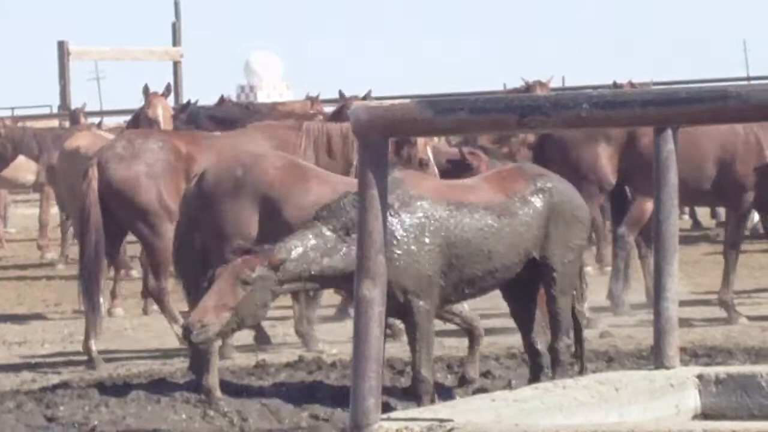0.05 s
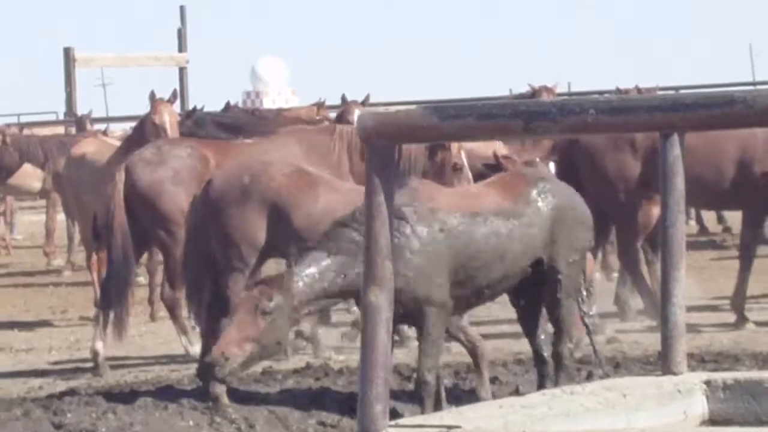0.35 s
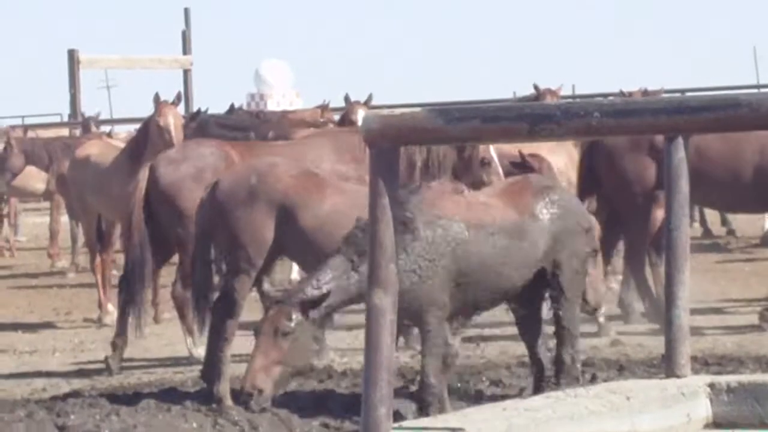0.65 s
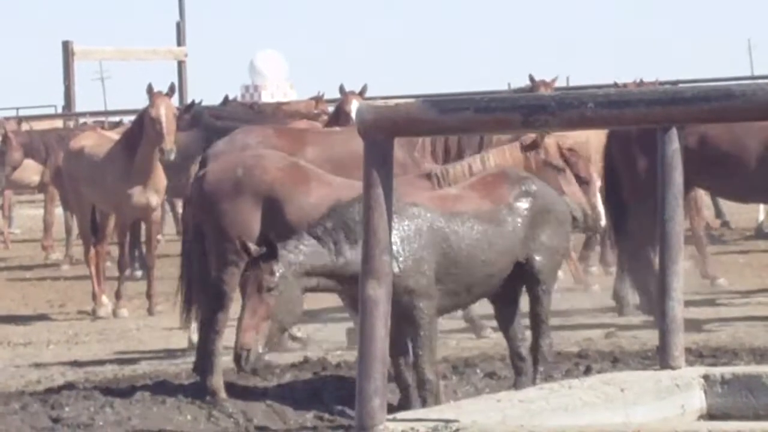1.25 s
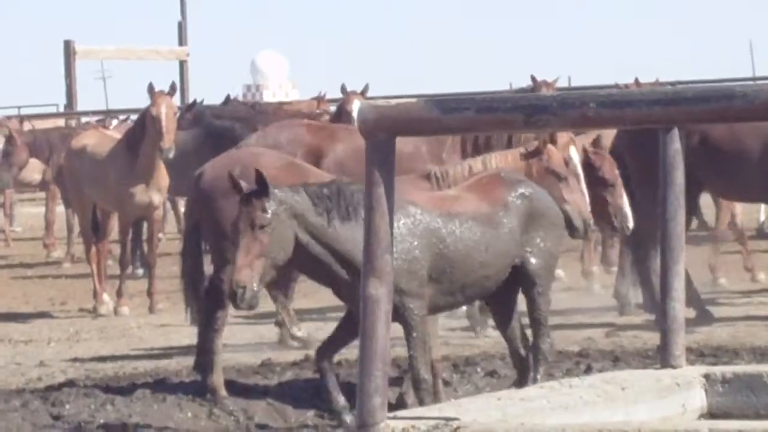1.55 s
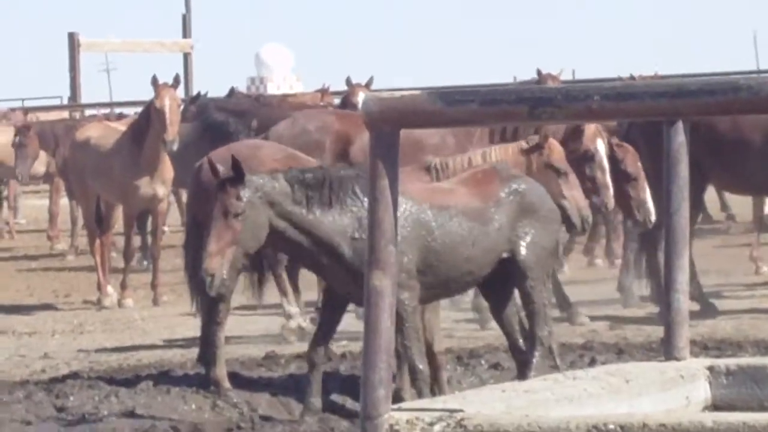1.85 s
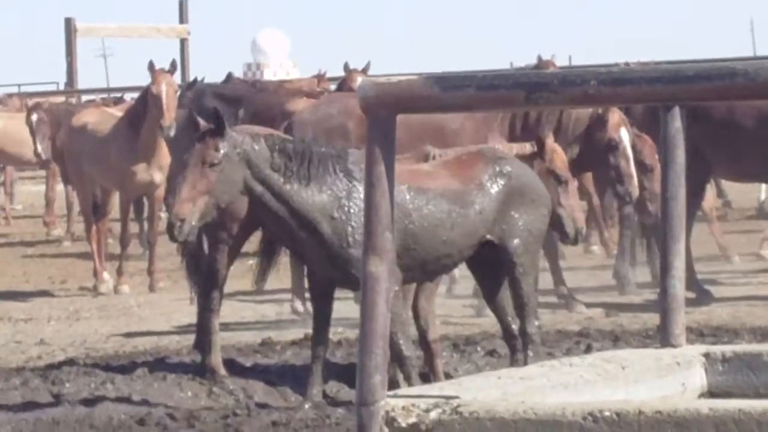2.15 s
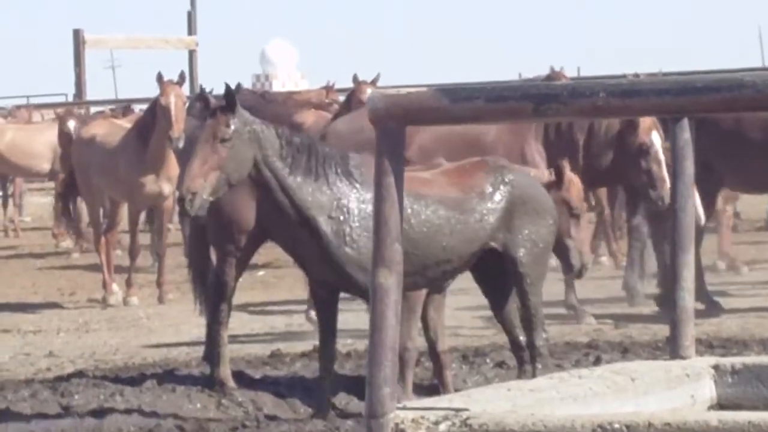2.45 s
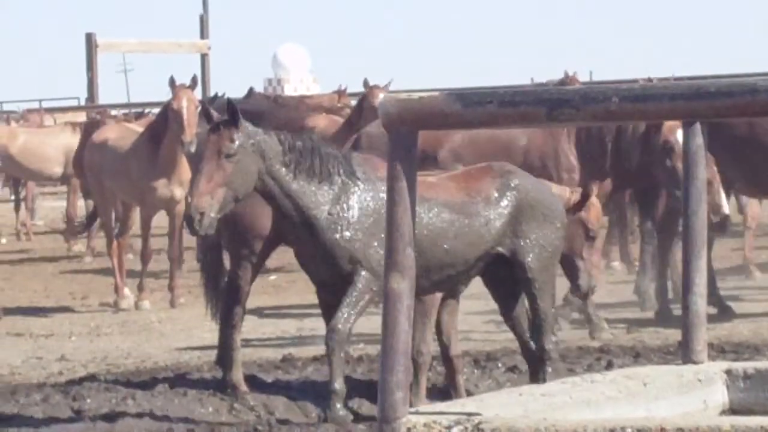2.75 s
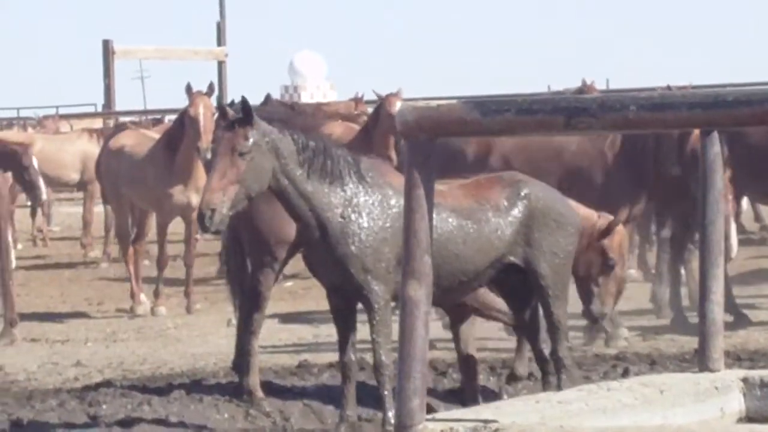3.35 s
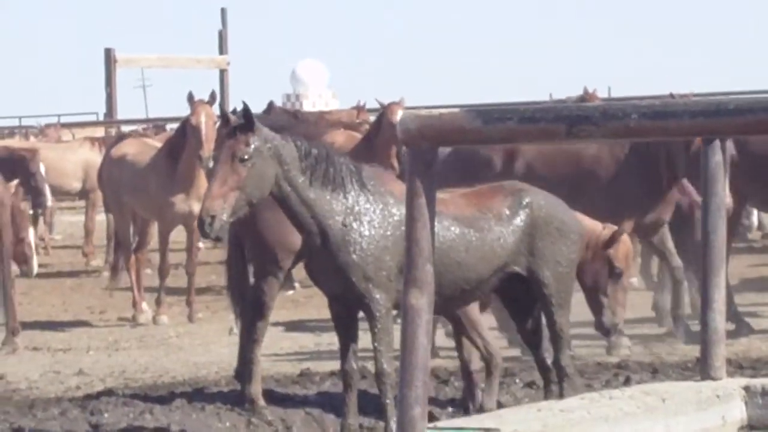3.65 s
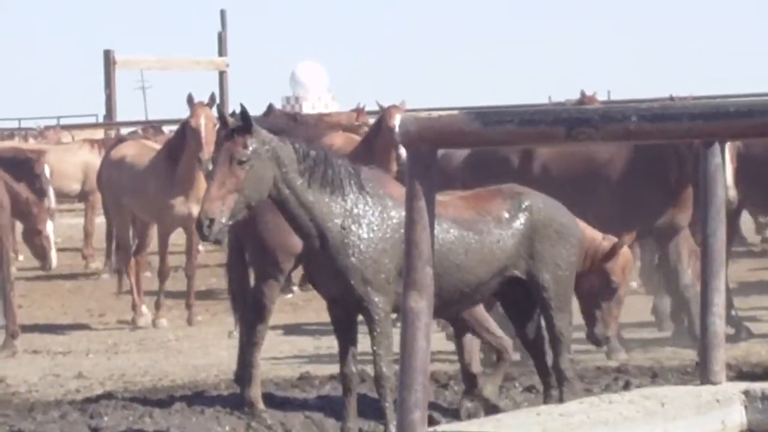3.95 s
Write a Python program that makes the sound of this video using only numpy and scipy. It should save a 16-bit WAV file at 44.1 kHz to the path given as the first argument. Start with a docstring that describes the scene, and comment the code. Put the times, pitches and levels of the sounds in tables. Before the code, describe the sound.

Wet mud squelches under a horse's hooves from about 0.3 to 1.3 seconds, with small bubble pops, low plops and a hollow knock near 1 second, echoing slightly. Sparser, softer thuds and scuffs follow, with brief squelches near 1.8 and 3 seconds, and another with light knocks around 3.6. Throughout, small birds chirp some way off over a faint outdoor hiss, and light wind rumbles on the microphone.

```python
"""A horse shifts about in a wet corral: mud squelches in bursts of tiny clicks that ring its air
pockets, and bubbles snap with a rising pitch. Hooves plop in, knock hollowly and scuff the soil.
Small birds chirp some way off over a faint outdoor hiss; light wind rumbles on the microphone.
Mud and far birds echo in the yard."""
import sys
import numpy as np
from scipy import signal
from scipy.fft import rfft, irfft, next_fast_len
from scipy.io import wavfile
from scipy.ndimage import map_coordinates

SR = 44100
rng = np.random.default_rng(int(sys.argv[2]) if len(sys.argv) > 2 else 0)


def dump(signal):
    """Clip the signal to [-1, 1] and save it as 16-bit WAV at the path in sys.argv[1]."""
    limited = np.clip(np.atleast_2d(signal).T, -1, 1)
    pcm = np.round(limited * 32767).astype(np.int16)
    wavfile.write(sys.argv[1], SR, pcm)


N = 176400


def amp(db):
    """dB to gain."""
    return 10 ** (np.asarray(db) / 20)


def unit(x):
    """Scale to rms 1."""
    return x / np.sqrt(np.mean(x ** 2) + 1e-20)


def along(points, hz):
    """Interpolate (Hz, value) points on a log frequency axis."""
    knots_hz, values = np.transpose(points)
    return np.interp(np.log(hz + 1), np.log(knots_hz + 1), values)


def clock():
    """Sample times in s."""
    return np.arange(N) / SR


def wobble(knots_per_s):
    """Smooth random curve."""
    knots = rng.standard_normal(int(N * knots_per_s / SR) + 4)
    return map_coordinates(knots, [clock() * knots_per_s])


def add(track, at_s, sound):
    """Mix a sound into a track."""
    i = max(round(at_s * SR), 0)
    track[i:i + len(sound)] += sound[:N - i]


def filtered(x, response):
    """Zero-phase filter with gain response(Hz)."""
    size = next_fast_len(N + SR // 2)
    return irfft(rfft(x, size) * response(np.fft.rfftfreq(size, 1 / SR)), size)[..., :N]


def coloured(x, points, size=2048):
    """Minimum-phase filter from (Hz, dB) points, unit energy gain."""
    cepstrum = irfft(np.log(amp(along(points, np.fft.rfftfreq(size, 1 / SR)))))
    cepstrum[1:size // 2] *= 2
    cepstrum[size // 2 + 1:] = 0
    impulse = irfft(np.exp(rfft(cepstrum)))
    return signal.fftconvolve(x, impulse / np.linalg.norm(impulse))[:N]


def rush(colour):
    """Coloured stereo noise of rms 1: bass nearly mono, treble wider."""
    # stereo width (frequency [Hz], side minus mid [dB])
    width = [(30, -55), (70, -57), (130, -56), (250, -35.5), (500, -20.5), (1000, -17.5), (2000, -14.5),
             (3000, -26), (5000, -9), (8000, -8), (13000, -6.5)]

    def response(hz):
        angle = np.arctan(amp(along(width, hz)))
        return amp(along(colour, hz)) * [np.cos(angle), np.sin(angle)]

    mid, side = filtered(rng.standard_normal((2, N)), response)
    return unit(np.array([mid + side, mid - side]))


def grains(length_s, clicks_per_s=1500, spread_db=5.5, attack_s=0.0015, release_s=0.0041):
    """Burst of tiny uneven clicks: attack, hold, release."""
    t = np.arange(SR // 5) / SR
    hit = rng.random(len(t)) < clicks_per_s / SR
    clicks = hit * np.sign(rng.standard_normal(len(t))) * amp(spread_db * rng.standard_normal(len(t)))
    burst = clicks * np.minimum(t / attack_s, 1) * np.exp(-np.maximum(t - length_s, 0) / release_s)
    return burst * np.sqrt(length_s * SR) / (np.linalg.norm(burst) + 1e-9)


def yard_echo(x, t60_s):
    """Diffuse echo off fences and animals, nearly mono."""
    t = np.arange(SR // 2) / SR
    mid, side = rng.standard_normal((2, len(t))) * amp(-60 * t / t60_s) * amp([[0], [-20]])
    tail = np.array([mid + side, mid - side]) / np.linalg.norm(mid)
    return signal.fftconvolve(x[None], tail, axes=1)[:, :N]


def air(hiss_db=-52, flock_db=-61):
    """Steady outdoor hiss and a blur of far birds."""
    # hiss and flock spectra (frequency [Hz], gain [dB])
    hiss_colour = [(180, -16), (300, 2.5), (337, -3), (543, -1.5), (718, -3.5), (876, -5.5), (1020, -6.5),
                   (1320, -8.5), (1840, -11.5), (2560, -10.5), (2770, -15), (3220, -20), (3670, -12),
                   (5110, -13.5), (6870, -15.5), (11300, -20.5), (12000, -22.5), (14700, -22), (15400, -22)]
    flock_colour = [(2000, -43), (2600, -7.5), (2950, -3.5), (3300, -5.5), (3900, -19), (6000, -40)]
    hiss = amp(hiss_db + 0.16 * wobble(5.4)) * rush(hiss_colour)
    flock = amp(flock_db + 1.55 * wobble(18)) * rush(flock_colour)
    return hiss + flock


def wind():
    """Gusts on the microphone; above them a lighter rumble of wind and trampling."""
    # gust and rumble envelopes (time [s], relative level [dB])
    gust_levels = [(0.0, -33), (0.29, -39.5), (0.3, -30), (0.88, -37.5), (0.96, -43), (1.0, -32),
                   (1.7, -49), (1.75, -42), (2.17, -51.5), (2.52, -50), (2.62, -34.5), (2.64, -44.5),
                   (2.83, -35), (2.86, -38.5), (3.01, -34), (3.12, -48), (3.94, -42.5), (4.0, -52)]
    rumble_levels = [(0.0, -39.5), (0.26, -40.5), (0.33, -35.5), (0.43, -40), (0.52, -37), (0.54, -39),
                     (0.59, -37.5), (1.73, -49.5), (2.97, -45.5), (3.01, -50), (3.05, -49.5), (4.0, -44.5)]
    # gust and rumble spectra (frequency [Hz], gain [dB])
    gust_colour = [(15, -12.5), (28, -1), (45, -2.5), (80, -4.5), (120, -12.5), (180, -23), (400, -68)]
    rumble_colour = [(50, -12), (100, 3.5), (140, 2.5), (240, -2), (330, -11), (600, -22.5), (1500, -43)]
    gust_db = np.interp(clock(), *np.transpose(gust_levels)) + 2 + 1.4 * wobble(18)
    gusts = amp(gust_db) * rush(gust_colour)
    rumble_db = np.interp(clock(), *np.transpose(rumble_levels)) - 1 + 2.1 * wobble(24.97)
    return gusts + amp(rumble_db) * rush(rumble_colour)


def birds(far_waver=0.036, far_flutter_db=3.5, echo_db=2):
    """Whistles arc through three pitches; near ones are clean, far ones waver and blur into echo."""
    # chirps (time [s], length [s], start [Hz], middle [Hz], end [Hz], level [dB], distance [0-1])
    chirps = [(0.219, 0.042, 3370, 3410, 3260, -50.5, 0.67), (0.253, 0.04, 3160, 2870, 3150, -43.5, 0.14),
              (0.633, 0.051, 3040, 2900, 3100, -44.5, 0.7), (0.684, 0.031, 4340, 4910, 5230, -49, .6),
              (0.302, 0.021, 3030, 2900, 2880, -46, 0.45), (0.75, 0.044, 3010, 2990, 2850, -45, .4),
              (0.917, 0.045, 3740, 4910, 3700, -46, 0.45), (0.986, 0.014, 2770, 2960, 3180, -39, .05),
              (1.105, 0.035, 2930, 3170, 3380, -40, 0.2), (1.144, 0.019, 3430, 2980, 3070, -40.5, .05),
              (1.293, 0.057, 3320, 3295, 3150, -51, 0.37), (1.474, 0.045, 3100, 3280, 3240, -54, .4),
              (1.649, 0.055, 3210, 3390, 3090, -48.5, 0.14), (1.812, .036, 5000, 4600, 4250, -57, .5),
              (1.877, .022, 4930, 4750, 4200, -55, .5), (1.96, 0.023, 2950, 3210, 3470, -52, 0.35),
              (1.994, 0.026, 3370, 3130, 2870, -48.5, .2), (2.206, 0.031, 2980, 2845, 2850, -45.5, .6),
              (2.226, .025, 6000, 6650, 6940, -57, 0.06), (2.248, .05, 2940, 3030, 3050, -56, 1),
              (2.255, .016, 4380, 4950, 5100, -43, 0.45), (2.267, .038, 5040, 4920, 4500, -39, 0.25),
              (2.348, 0.025, 3210, 3320, 3350, -48.5, .3), (2.369, .012, 4350, 4600, 4800, -52, .2),
              (2.376, 0.021, 3310, 3070, 2740, -47, 0.3), (2.423, 0.057, 3480, 3370, 3400, -51, 0.57),
              (2.476, 0.075, 2913, 2910, 2870, -49, 0.78), (2.836, .022, 6000, 6360, 6700, -56, .3),
              (2.871, 0.019, 4700, 5220, 5270, -44.5, .25), (2.881, 0.039, 5080, 4950, 4830, -46.5, .35),
              (2.968, .03, 4050, 4330, 4330, -57, .2), (3.037, 0.082, 2970, 2955, 3060, -52.5, 0.99),
              (3.1, 0.062, 3310, 3420, 3380, -59.5, 1), (3.146, 0.092, 2986, 2950, 2900, -45, 0.82),
              (3.281, .03, 2900, 2816, 2900, -54, .8), (3.321, 0.058, 3100, 3300, 3240, -44.5, 0.37),
              (3.375, 0.015, 3080, 2790, 2780, -46.5, 0.16), (3.553, 0.047, 3570, 3290, 3230, -55, .8),
              (3.583, 0.043, 3017, 2940, 3140, -43, 0.38), (3.644, 0.025, 3060, 2970, 2920, -53, 0.68),
              (3.849, 0.042, 3910, 3460, 3360, -55, 0.75), (3.877, 0.069, 3080, 3004, 2900, -52.5, 0.75)]
    direct, scattered = np.zeros((2, N))
    waver, flutter = unit(wobble(500) + wobble(130) / 2), wobble(220)
    for at_s, length_s, start_hz, middle_hz, end_hz, db, distance in chirps:
        progress = np.linspace(0, 1, int(length_s * SR))
        span = int(at_s * SR) + np.arange(len(progress))
        arc = np.polyfit([0, 0.5, 1], [start_hz, middle_hz, end_hz], 2)
        hz = np.polyval(arc, progress) * (1 + distance * far_waver * waver[span])
        gain = amp(db + distance * far_flutter_db * flutter[span])
        envelope = np.sqrt(np.abs(np.sin(np.pi * progress)))
        note = gain * envelope * np.sin(2 * np.pi * np.cumsum(hz) / SR)
        add(direct, at_s, (1 - distance / 2) * note)
        add(scattered, at_s, distance * note)
    return direct + amp(echo_db) * yard_echo(scattered, t60_s=0.25)


def hoof_scuffs():
    """Hooves scrape soil: dull, gritty bursts."""
    # scuffs (time [s], length [s], level [dB])
    scuffs = [(0.499, 0.054, -52.5), (1.76, 0.041, -50), (2.956, 0.049, -60), (3.621, 0.065, -48),
              (3.814, 0.0098, -49)]
    # soil spectrum (frequency [Hz], gain [dB])
    soil_colour = [(100, 2.5), (250, 5), (500, 8), (900, -4), (1500, -17), (3000, -5), (8000, -47)]
    grit = np.zeros(N)
    for at_s, length_s, db in scuffs:
        add(grit, at_s, amp(db) * grains(length_s))
    return coloured(grit, soil_colour)


def hoof_thuds(attack_s=0.0032, trim_db=-3):
    """Hooves sink into mud or land on soil: low damped sines."""
    # thuds (time [s], pitch [Hz], peak before trim [dB], t60 [s])
    thuds = [(0.3123, 80, -13, 0.031), (0.36, 90, -16, 0.032), (.393, 100, -20.5, .03),
             (0.542, 216, -14, 0.071), (0.678, 96, -20, 0.05), (.72, 279, -31, 0.1),
             (1.069, 123, -24.5, 0.081), (2.001, 65, -30, 0.099), (2.6, 74.6, -23, 0.079),
             (2.804, 46.7, -19.5, 0.24), (2.991, 52, -16.5, 0.094), (3.632, 107, -25, 0.047)]
    track = np.zeros(N)
    t = np.arange(SR // 4) / SR
    for at_s, hz, db, t60_s in thuds:
        swell = amp(-60 * t / t60_s) * (1 - np.exp(-(t / attack_s) ** 2))
        add(track, at_s, amp(db + trim_db) * swell / swell.max() * np.sin(2 * np.pi * hz * t))
    return track


def hoof_knocks(attack_s=0.0011, tail_db=-22.5, base_tail_t60_s=0.16):
    """Impacts ring the hoof's hollow modes, with a diffuse tail."""
    # knocks (time [s], peak [dB], pitch [ratio], ring length [ratio])
    knocks = [(1.0486, -19, 0.97, 0.96), (3.644, -31.5, 0.81, 0.64), (3.6651, -38, 0.92, 0.47),
              (3.8165, -42.5, 0.8, 0.41)]
    # hoof modes (base frequency [Hz], relative level [dB], base t60 [s])
    modes = [(608, -6.5, 0.05), (722, 3, 0.026), (960, 3.5, 0.023), (1055, 1, 0.037)]
    track = np.zeros(N)
    t = np.arange(SR // 4) / SR
    for at_s, db, pitch, sustain in knocks:
        ring = sum(amp(mode_db - 60 * t / (t60_s * sustain)) * np.sin(2 * np.pi * hz * pitch * t)
                   for hz, mode_db, t60_s in modes)
        ring *= 1 - np.exp(-(t / attack_s) ** 2)
        scatter = rng.standard_normal(len(t)) * amp(-60 * t / (base_tail_t60_s * sustain))
        tail = signal.fftconvolve(scatter, ring / np.linalg.norm(ring))[:len(t)]
        add(track, at_s, amp(db) * (amp(tail_db) * tail - ring / np.abs(ring).max()))
    return track


def mud_pockets(x, size=2048):
    """Air pockets in the mud resonate; unit energy gain."""
    # pocket modes (frequency [Hz], bandwidth [Hz], relative level [dB])
    modes = [(268, 23, 13), (560, 200, 7), (1220, 190, 7), (1730, 97, 6), (2180, 170, 3), (2900, 130, -30)]
    t = np.arange(size) / SR
    impulse = sum(amp(db) * width_hz * np.exp(-np.pi * width_hz * t) * np.cos(2 * np.pi * hz * t)
                  for hz, width_hz, db in modes)
    return signal.fftconvolve(x, impulse / np.linalg.norm(impulse))[:N]


def mud_squelches(body_db=-5):
    """Mud squeezes out in click bursts. Returns the drives for spray and wet body."""
    # squelches (time [s], length [s], level [dB], extra body [dB])
    squelches = [(0.304, 0.027, -54.5, 2), (.405, 0.047, -61.5, 7), (0.454, 0.031, -51, -12),
                 (0.514, 0.056, -61.5, 8), (0.58, 0.027, -51.5, -9), (0.614, 0.008, -44, -5),
                 (0.716, 0.032, -47, 6.5), (0.846, 0.021, -46, 7), (0.971, 0.023, -49, 10),
                 (1.005, 0.0096, -52, 4), (1.025, 0.011, -50.5, 0), (1.137, 0.021, -58.5, 13.5),
                 (1.217, 0.0091, -56, -8), (1.284, 0.029, -55, -6), (1.767, 0.036, -64.5, 16),
                 (2.971, 0.045, -58.5, 11), (3.61, 0.022, -53, -2)]
    spray, body = np.zeros((2, N))
    for at_s, length_s, db, extra_db in squelches:
        burst = amp(db) * grains(length_s)
        add(spray, at_s, burst)
        add(body, at_s, amp(body_db + extra_db) * burst)
    return spray, body


def bubble_snaps(attack_s=0.00047, crackle_t60_s=0.016, spread_db=5):
    """Each bubble bursts with a crackle and rings at a rising pitch. Returns crackles and tones."""
    # snaps (time [s], crackle level [dB], start pitch [Hz], tone level [dB])
    snaps = [(.3135, -44, 2100, -44), (0.3574, -42, 2900, -52), (.407, -52, 1720, -43),
             (.4665, -38.5, 2200, -50), (.6155, -34.5, 2490, -39), (0.621, -37, 4060, -40),
             (0.715, -28.5, 1148, -28), (.7175, -42, 2050, -28), (.724, -41, 1134, -36),
             (.731, -38, 1660, -42), (0.7417, -31, 2240, -33), (.7505, -34.5, 2220, -28),
             (.756, -36.5, 2880, -44), (0.76, -44, 4300, -48), (0.8368, -41, 2200, -48),
             (.8525, -42, 2020, -34), (.859, -47, 1840, -33), (.8625, -46, 2290, -39),
             (0.871, -36, 2400, -53), (0.9809, -41, 1250, -31.5), (.983, -42, 1760, -33),
             (.995, -52, 504, -36.5), (1.004, -38, 1700, -37), (1.0268, -36, 2180, -32),
             (1.049, -38.5, 2550, -38), (1.1318, -56, 990, -43), (1.147, -45, 2300, -50),
             (1.16, -48, 2000, -42), (1.187, -44, 2400, -48), (1.2895, -38.5, 2300, -55),
             (3.0075, -48, 2240, -40), (3.0115, -47, 2280, -46), (3.6255, -50, 2110, -48),
             (3.646, -48, 1500, -41), (3.6535, -54, 1420, -44)]
    ring_cycles, pitch_rise = 32.4, 0.085  # per 60 dB of decay
    crackles, tones = np.zeros((2, N))
    t = np.arange(SR // 16) / SR
    onset = 1 - np.exp(-t / attack_s)
    for at_s, crackle_db, hz, tone_db in snaps:
        fade = onset * amp(crackle_db - 60 * t / crackle_t60_s)
        crackle = fade * rng.standard_normal(len(t)) * amp(spread_db * rng.standard_normal(len(t)))
        add(crackles, at_s, crackle * np.linalg.norm(fade) / np.linalg.norm(crackle))
        age = t * hz / ring_cycles
        phase = 2 * np.pi * hz * t * (1 + pitch_rise * age / 2)
        add(tones, at_s, onset * amp(tone_db - 60 * age) * np.sin(phase))
    return crackles, tones


def mud(snap_body_db=-8):
    """Squelches and snaps give a bright spray and ring the air pockets; bubble tones on top."""
    # spray spectrum (frequency [Hz], gain [dB])
    spray_colour = [(200, -18), (1000, -8.5), (2000, 4), (3000, 2), (3500, -0.5), (4200, 6.5), (4800, 1),
                    (5400, -13), (6500, 0.5), (7500, 3.5), (8800, -11.5), (10500, -8.5), (12000, -22),
                    (14000, -10), (15500, -20)]
    spray, body = mud_squelches()
    crackles, tones = bubble_snaps()
    pocket_ring = mud_pockets(body + amp(snap_body_db) * crackles)
    return coloured(spray + crackles, spray_colour) + pocket_ring + tones


def scene(mud_echo_db=-8.5):
    """Horse and birds straight ahead in the open yard."""
    wet_mud = mud()
    background = wind() + air()
    hooves = hoof_knocks() + hoof_thuds() + hoof_scuffs()
    mud_echo = amp(mud_echo_db) * yard_echo(wet_mud, t60_s=0.86)
    return background + birds() + hooves + wet_mud + mud_echo


def record(dry, top_hz=15400):
    """Brick-wall low-pass at the camera's band limit."""
    return filtered(dry, lambda hz: hz < top_hz)


dry = scene()
out = record(dry)
dump(out)
```